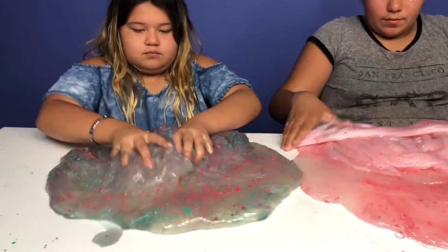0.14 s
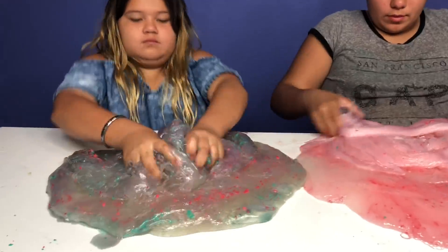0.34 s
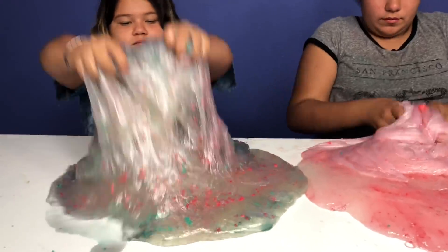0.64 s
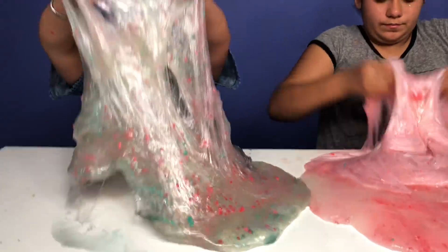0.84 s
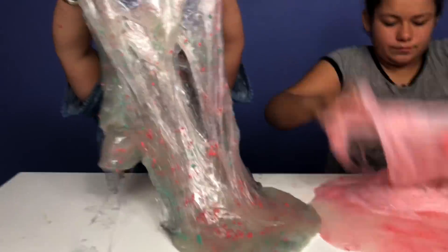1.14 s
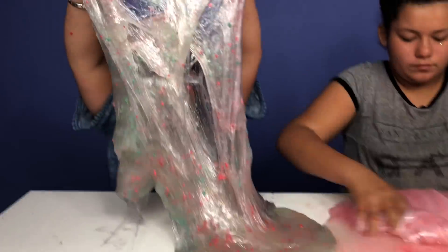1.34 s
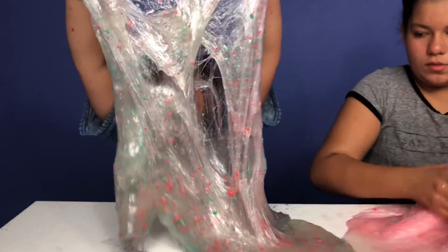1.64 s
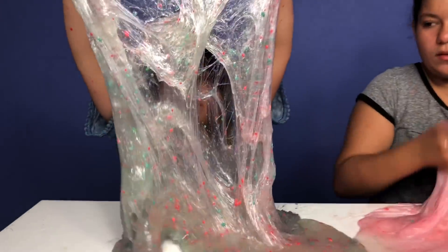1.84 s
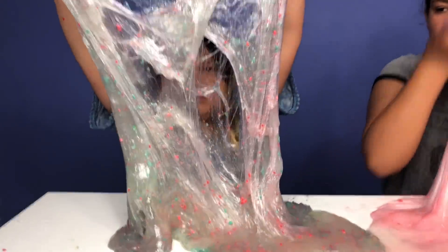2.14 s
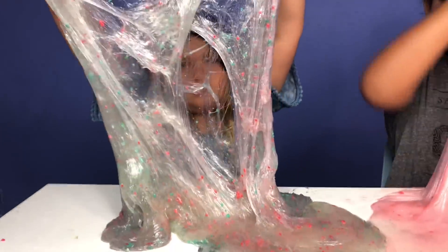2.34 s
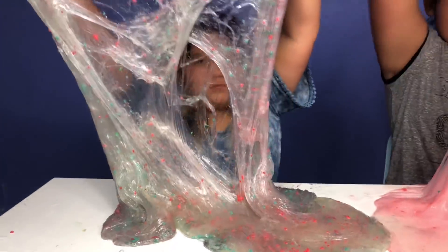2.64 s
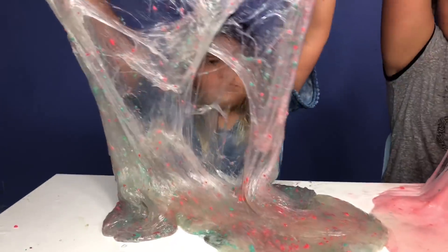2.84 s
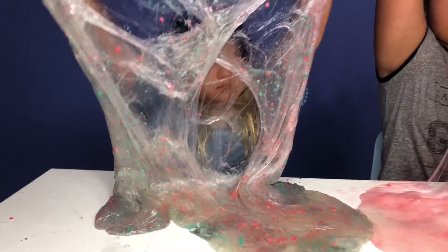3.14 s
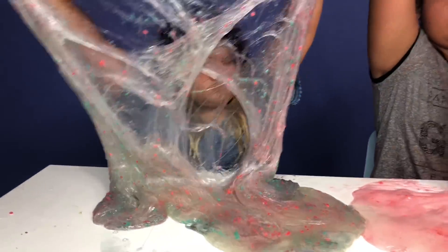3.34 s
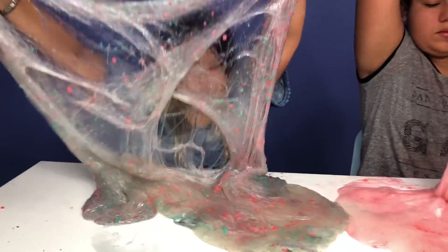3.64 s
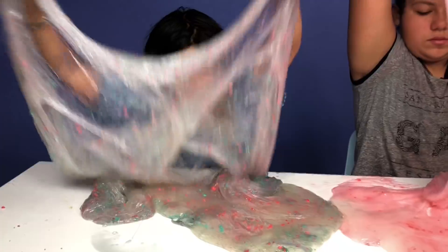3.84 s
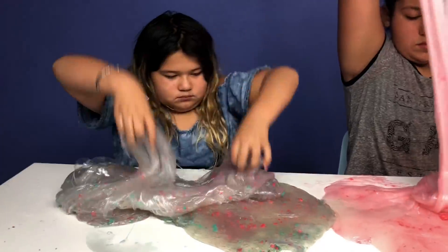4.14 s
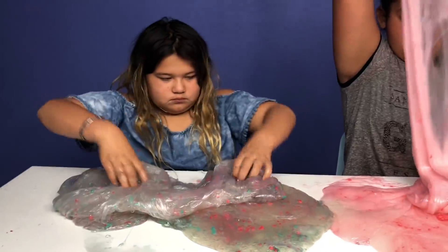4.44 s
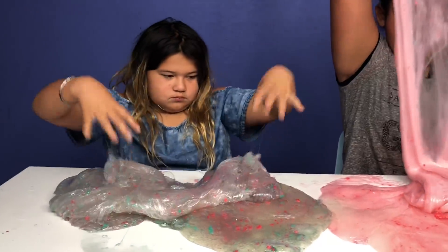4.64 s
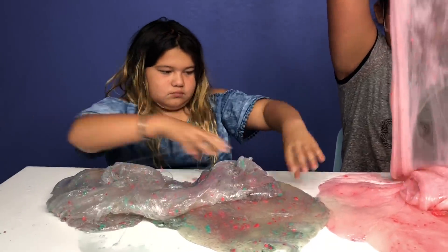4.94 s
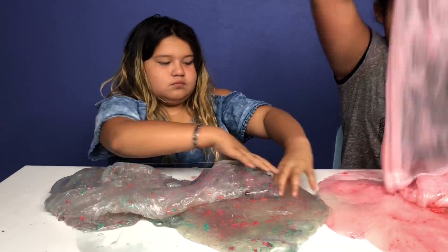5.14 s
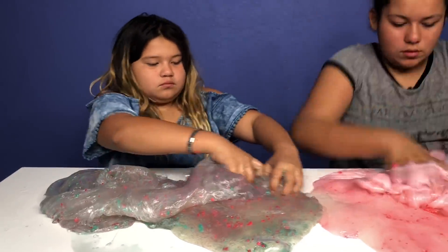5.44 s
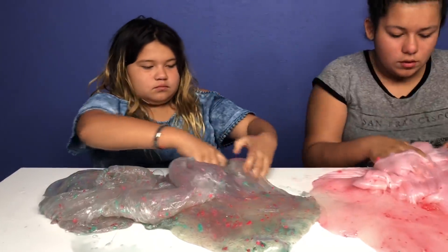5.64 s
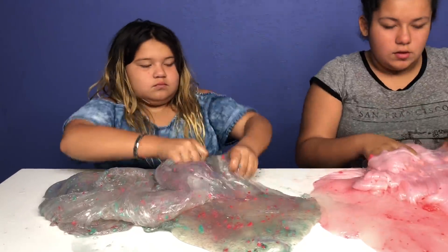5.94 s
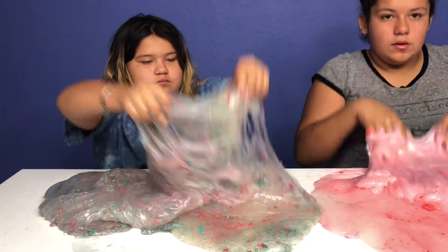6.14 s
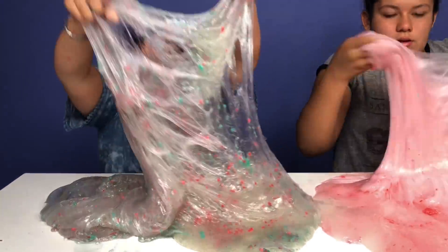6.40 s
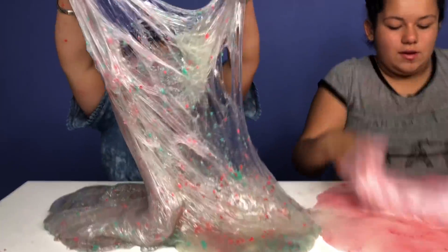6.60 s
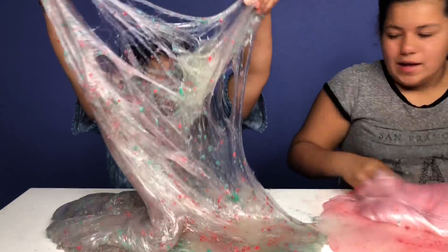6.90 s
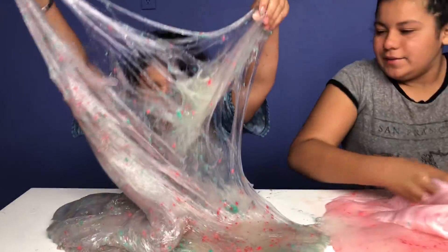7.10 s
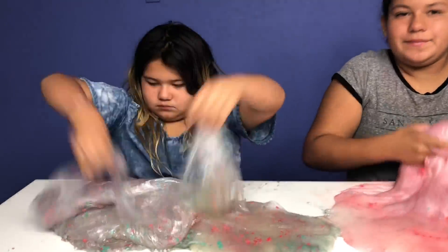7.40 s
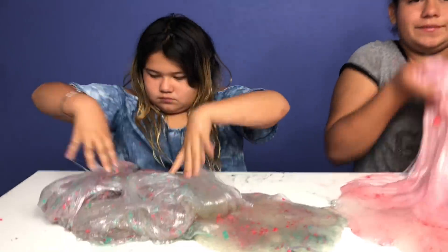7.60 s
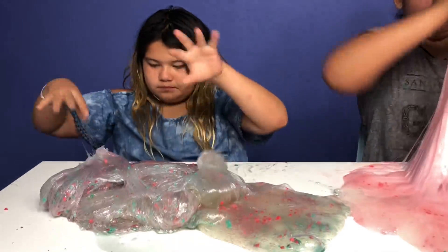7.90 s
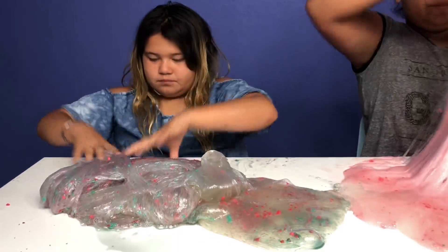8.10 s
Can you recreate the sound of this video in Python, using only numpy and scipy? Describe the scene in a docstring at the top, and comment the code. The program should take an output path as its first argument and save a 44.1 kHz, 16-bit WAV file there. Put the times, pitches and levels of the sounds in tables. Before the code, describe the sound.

Sticky slime full of popping candy is kneaded, stretched and dropped on a table, fizzing and snapping sharply, with wet slaps and squelches.

```python
"""Popping-candy slime on a table

Slime full of popping candy is kneaded and stretched on a table in a small, live room.
Clouds of tiny ringing bursts make the fizz, sticky crackle and squelch; placed bursts make the loud snaps.
Gliding trains of short rings run from sticky to low; heavy folds flop as swells of noise and splash.
Knocks sweep down in pitch and ring the table top; decaying noise gives the echo, over soft room air."""
import sys
import numpy as np
from scipy import signal
from scipy.fft import irfft
from scipy.io import wavfile

SR = 44100
rng = np.random.default_rng(int(sys.argv[2]) if len(sys.argv) > 2 else 0)


def generate_wav(signal):
    """Clip the signal to [-1, 1] and save it as 16-bit WAV at the path in sys.argv[1]."""
    frames = np.transpose(np.atleast_2d(signal))
    scaled = np.clip(frames, -1, 1) * 32767
    pcm = np.round(scaled).astype(np.int16)
    wavfile.write(sys.argv[1], SR, pcm)


N = 364266   # length in samples


def from_db(db):
    """Decibels to gain."""
    return 10 ** (np.asarray(db) / 20)


def rms_one(x):
    """Scale to rms 1."""
    return x / np.sqrt(np.mean(x ** 2) + 1e-20)


def at_hz(points, hz):
    """Read a table on a log-frequency axis."""
    points = np.array(points)
    return np.interp(np.log(hz), np.log(points[:, 0]), points[:, 1])


def add(track, s, sound):
    """Mix a sound in from time s on."""
    start = max(round(s * SR), 0)
    track[start:start + len(sound)] += sound[:max(N - start, 0)]


def noise_bands(size, count=19):
    """Half-octave bands (Hz, noise), from the deep bass upwards, that add up to roughly white noise."""
    edges = 30 * 2 ** (np.arange(count + 1) / 2)
    white = rng.standard_normal((2, size))   # neighbouring bands use different noise
    for k, (low, high) in enumerate(zip(edges, edges[1:])):
        sos = signal.butter(2, [low, min(high, .48 * SR)], "band", fs=SR, output="sos")
        yield np.sqrt(low * high), signal.sosfilt(sos, white[k % 2])


def cavity(x, hz, q):
    """A damped resonance; a unit click comes out with unit energy."""
    w = 2 * np.pi * min(hz, .45 * SR) / SR
    damp = np.sin(w) / (2 * max(q, .2))
    numerator = [damp, 0, -damp]
    denominator = [1 + damp, -2 * np.cos(w), 1 - damp]
    return signal.lfilter(numerator, denominator, x + 1e-18) * np.sqrt((1 + damp) / damp)


def burst(x, hz, q, shell_share=0.24):
    """A bursting pocket swells through two resonances in a row, then rings out; unit energy."""
    shell = cavity(x, hz, shell_share * q)
    return rms_one(cavity(shell, hz, q)) / np.sqrt(len(x))


def broad_peak(hz, pitch, q):
    """Gain of a soft contact: strongest round its pitch, with little treble."""
    return 1 / np.hypot(1, q * (hz / pitch - pitch / hz)) / np.hypot(1, hz / (4 * pitch))


def grains(colour, per_s, spread_db, q, size, count):
    """Tiny bursts at random moments, mostly weak, each ringing at one of many pitches; rms 1."""
    total = int(per_s * size / SR) + 1
    when, which, strength, sign = rng.random((total, 4)).T
    height_db = spread_db * np.minimum(-np.log(1 - strength), 4.5)
    height = from_db(height_db) * np.sign(sign - .5)
    out = np.zeros(size)
    for k, hz in enumerate(np.geomspace(colour[0][0], colour[-1][0], count)):
        mine = (which * count).astype(int) == k
        click = signal.unit_impulse(int(3 * q * SR / hz) + 8)
        grain = from_db(at_hz(colour, hz)) * burst(click, hz, q)
        places = (when[mine, None] * size).astype(int) + np.arange(len(grain))
        out += np.bincount(places.ravel(), np.outer(height[mine], grain).ravel(), size)[:size]
    return rms_one(out)


# Still air of the room. Each row: frequency in Hz, relative level in dB per Hz.
AIR_COLOUR = [(30, -7), (65, 5.5), (140, -1.5), (400, -7.5), (1200, -3.5), (3000, -7), (7000, -17),
              (15000, -8)]
AIR_DB = -58


def room_air():
    """The still air is steady noise, weighted band by band."""
    return from_db(AIR_DB) * rms_one(sum(from_db(at_hz(AIR_COLOUR, hz)) * band for hz, band in noise_bands(N)))


# Candy fizz drive, livelier while the slime is drawn out into a sheet.
# Each row: time in seconds, drive in dB before the layer trims.
CANDY_DRIVE = [(0.0, -51.5), (0.62, -46.5), (2.39, -46.5), (3.31, -49), (3.43, -47), (4.26, -49),
               (4.58, -51.5), (5.22, -50), (5.45, -49), (5.73, -53), (5.93, -47.5), (6.21, -47),
               (6.53, -44.5), (6.83, -41.5), (7.06, -45.5), (7.84, -50)]
# The hands squeeze or pull the slime. Each row: start in seconds, hold in seconds,
# sticky crackle drive in dB, squelch drive in dB (both before the layer trims).
HAND_STROKES = [(0.073, 0.36, -54, -53.5), (0.52, 0.48, -49, -51), (0.994, 0.14, -50, -71),
                (1.788, 0.33, -50, -56), (2.327, 0.13, -52.5, -56.5), (3.593, 0.12, -55.5, -64),
                (4.055, 0.0072, -49, -50.5), (4.48, 0.076, -54.5, -58.5), (5.386, 0.035, -48, -47.5),
                (6.125, 0.18, -50, -51), (7.128, 0.34, -56, -56), (7.55, 0.38, -49.5, -55.5),
                (8.185, 0.08, -67, -51)]
GRIP_S, RELAX_S = 0.073, 0.12   # exponential rise and fall of every stroke
CREEP_STICKY_DB, CREEP_SQUELCH_DB = -58.5, -65.5   # drives as the slime creeps under its own weight


def handling():
    """Gains of fizz, sticky crackle and squelch: each stroke swells, holds and relaxes to a slow creep."""
    t = np.arange(N) / SR
    fizz = from_db(np.interp(t, *np.transpose(CANDY_DRIVE)))
    sticky, squelch = from_db(CREEP_STICKY_DB), from_db(CREEP_SQUELCH_DB)
    for s, hold, sticky_db, squelch_db in HAND_STROKES:
        before, after = np.maximum(s - t, 0), np.maximum(t - s - hold, 0)
        effort = np.exp(-before / GRIP_S - after / RELAX_S)
        sticky = np.hypot(sticky, from_db(sticky_db) * effort)
        squelch = np.hypot(squelch, from_db(squelch_db) * effort)
    return fizz, sticky, squelch


# Colour of the fine candy fizz. Each row: grain pitch in Hz, relative level in dB.
FIZZ_COLOUR = [(3000, -19), (4500, -3), (6500, 0.5), (9000, 3.5), (12000, -13.5), (15000, -29)]
# Colour of the lone candy ticks. Each row: grain pitch in Hz, relative level in dB.
TICK_COLOUR = [(2000, -2.5), (5000, 3.5), (11000, 2.5)]
# Colour of the sticky clicks. Each row: grain pitch in Hz, relative level in dB.
STICKY_COLOUR = [(1100, -3), (2000, 3), (3000, 7), (4200, 3)]
# Colour of the soft squelch. Each row: grain pitch in Hz, relative level in dB.
SQUELCH_COLOUR = [(140, -6), (260, -7.5), (450, 2.5), (750, 0.5), (1200, 0.5)]


def crackle(fizz_gain, sticky_gain, squelch_gain):
    """One patch of slime: fine fizz, lone candy ticks, sticky clicks and a soft squelch."""
    fizz = from_db(-2.5) * grains(FIZZ_COLOUR, per_s=320, spread_db=3.5, q=2.03, size=N, count=9)
    ticks = from_db(-5.5) * grains(TICK_COLOUR, per_s=7.0, spread_db=1.3, q=2.5, size=N, count=8)
    sticky = from_db(-3.0) * grains(STICKY_COLOUR, per_s=65, spread_db=6.0, q=2.36, size=N, count=7)
    squelch = from_db(-1.5) * grains(SQUELCH_COLOUR, per_s=60, spread_db=3.0, q=2.47, size=N, count=9)
    return fizz_gain * (fizz + ticks) + sticky_gain * sticky + squelch_gain * squelch


# How long the room rings. Each row: frequency in Hz, time to fall by 60 dB in seconds.
ECHO_T60 = [(100, 0.62), (700, 0.74), (1800, 0.65), (5000, 0.5), (13000, 0.63)]
# Colour of the echo. Each row: frequency in Hz, relative echo level in dB.
ECHO_COLOUR = [(60, 8), (300, 2.5), (750, -2), (1400, 6.5), (2300, 3.5), (7000, 4), (15000, 0)]


def room(x, gap_s, size=24576):
    """Diffuse echo that dies band by band and starts just after the direct sound; unit energy."""
    t, echo = np.arange(size) / SR, 0
    for hz, band in noise_bands(size):
        t60 = at_hz(ECHO_T60, hz)
        tail = rms_one(band * from_db(-60 * t / t60))
        echo = echo + from_db(at_hz(ECHO_COLOUR, hz)) * np.sqrt(hz * t60) * tail
    fade_in = np.clip(t / gap_s - 1, 0, 1)
    echo = rms_one(echo * fade_in) / np.sqrt(size)
    return signal.fftconvolve(x, echo)[:N]


# The loudest snaps of candy and of air pockets.
# Each row: start in seconds, energy in dB with its splinters, pitch in Hz, sharpness Q.
LOUD_POPS = [(0.1621, -13.5, 6500, 1.7), (0.3326, -14.5, 10900, 3.3), (0.421, -10.5, 11100, 3.6),
             (0.4735, -9, 5200, 8.4), (0.493, -8, 4300, 3.5), (0.5821, -14, 1180, 1.8),
             (0.693, -3.5, 8900, 1.2), (0.7834, -12.5, 6100, 3.4), (1.039, -4.5, 3320, 3.7),
             (1.2935, -9, 6100, 4.3), (1.3219, -2.5, 1290, 3), (1.483, -10.5, 9500, 4.3),
             (1.6326, -10, 5900, 2.6), (1.6352, -11, 1290, 6), (1.6854, -12, 3260, 2.6),
             (1.8123, -12.5, 9700, 3.6), (2.1054, -3.5, 4100, 3.4), (2.443, -12, 8950, 4),
             (2.607, -8.5, 7200, 2), (2.953, -14, 8200, 1.4), (2.9756, -2.5, 5900, 4),
             (3.0462, -11, 7000, 2), (3.2659, 5.5, 7270, 2.1), (3.514, -16, 8500, 4.5),
             (3.708, -10, 7150, 1.4), (3.802, -16.5, 1240, 2), (4.0011, 1, 8100, 1.9),
             (4.2545, -6.5, 5400, 3.7), (4.826, -12.5, 5840, 3), (5.2815, -13, 7350, 2),
             (5.2994, -3.5, 5700, 3), (5.3582, -5.5, 8200, 1.3), (5.3668, -7.5, 3900, 2.7),
             (5.5045, 4, 5600, 1.8), (5.7982, -15, 5440, 7.5), (6.0506, -11, 2880, 1.7),
             (6.0861, -11, 5800, 3), (6.1482, -13, 11100, 5), (6.1717, 1.5, 9000, 0.91),
             (6.322, -12, 4360, 4), (6.4127, -9, 4180, 5.1), (6.467, -7, 5950, 1.7),
             (6.503, -11, 4950, 5.6), (6.6598, -12, 5870, 3), (6.7134, 1, 2040, 0.94),
             (6.724, -2, 3440, 2.2), (6.919, -7, 7100, 4.4), (6.9264, -9.5, 7700, 2.7),
             (6.979, -6, 8500, 1.4), (7.1436, -14, 2230, 1.5), (7.3195, -5.5, 2760, 2.5),
             (7.4858, -1, 5300, 9.9), (7.5084, -5, 4000, 0.72), (7.646, -5.5, 4260, 1.9),
             (7.682, -10.5, 6660, 5.7), (7.7325, -7, 2660, 1.8), (8.1478, -10, 8400, 2.4)]


def pops(splinter_db, splinter_s, scatter, body_db, body_ratio, body_q, count, size=1024):
    """A shell cracks, its cavity rings and the slime ticks dully; row 0 has snaps, the rest splinters."""
    out, click = np.zeros((count, N)), signal.unit_impulse(size)
    for (s, db, hz, q), chance in zip(LOUD_POPS, rng.random((len(LOUD_POPS), count - 1, 3))):
        body = from_db(body_db) * burst(click, body_ratio * hz, body_q)
        parts = [burst(click, hz, q) + body]
        for late, pitch, height in chance:
            delay = min(int(splinter_s * SR * (.15 + late)), size - 1)
            splinter_hz = hz * scatter ** ((2 * pitch - 1) / (1 + q))   # sharp snaps scatter less
            splinter = burst(signal.unit_impulse(size, delay), splinter_hz, q)
            parts.append(from_db(splinter_db) * (2 * height - 1) * splinter)
        for track, part in zip(out, parts / np.linalg.norm(parts)):
            add(track, s, from_db(db) * part)
    return out


# Ringing modes of the table top. Each row: frequency in Hz, level in dB against the thump,
# time to fall by 60 dB in seconds.
TABLE_MODES = [(61.5, 2, 0.21), (131.8, 3.5, 0.4), (255.7, 5.5, 0.18), (372, -2, 0.33)]
# The slime's weight or a hand lands on the table. Each row: time in seconds, slap energy in dB,
# pitch in Hz, travel time of 1 kHz across the top in seconds, thump level in dB.
TABLE_KNOCKS = [(0.222, -25, 260, 0.0068, -52.5), (1.2948, -5.5, 334, 0.004, -50),
                (1.322, -4.5, 450, 0.012, -54), (5.093, -16.5, 199, 0.006, -55),
                (5.5069, 3.5, 453, 0.012, -33), (6.689, -12, 264, 0.007, -39.5),
                (6.723, 0, 415, 0.012, -35.5), (7.509, -12, 520, 0.0065, -49),
                (8.2162, -8.5, 330, 0.00353, -45.5)]


def knocks(slap_q, build_s, size=22050):
    """A bending wave crosses the table, low notes slowest: slaps sweep down into the ringing modes."""
    slaps, thumps, reference_hz = np.zeros(N), np.zeros(N), 1000
    t, hz = np.arange(size) / SR, np.maximum(np.fft.rfftfreq(size, 1 / SR), 1)
    for s, slap_db, pitch, travel, thump_db in TABLE_KNOCKS:
        dispersion = np.exp(-4j * np.pi * travel * np.sqrt(reference_hz * hz))
        wave = irfft(broad_peak(hz, pitch, slap_q) * dispersion, size)
        add(slaps, s - travel, from_db(slap_db) * wave / np.linalg.norm(wave))
        for mode_hz, db, t60 in TABLE_MODES:
            # each mode starts half a cycle before its wave arrives
            arrival = travel * np.sqrt(reference_hz / mode_hz) - .5 / mode_hz
            since = np.maximum(t - arrival, 0)
            ring = np.sin(2 * np.pi * mode_hz * since) * (1 - np.exp(-since / build_s))
            add(thumps, s - travel, from_db(thump_db + db - 60 * since / t60) * ring)
    return slaps, thumps


# Gliding trains of short rings: sticky peels, a low blup, a ringing wash after the big slap, a low rub.
# Each row: start in seconds, length in seconds, level in dB before the mix trim,
# first pitch in Hz, last pitch in Hz.
RING_TRAINS = [(0.46, 0.23, -49.5, 5270, 3800), (0.659, 0.35, -52, 2780, 1770),
               (1.621, 0.085, -48.5, 1370, 1290), (2.284, 0.06, -46, 368, 320),
               (3.977, 0.22, -62, 616, 965), (5.543, 0.1, -43.5, 1390, 1000),
               (7.198, 0.29, -58.5, 148, 82.5), (7.802, 0.17, -57, 1690, 1470)]


def gliding_rings(per_s, spread_db, q, scatter, size=2048):
    """Short damped rings follow one another at random, crowding midway, while their pitch glides."""
    out, click = np.zeros(N), signal.unit_impulse(size)
    for s, length, db, first_hz, last_hz in RING_TRAINS:
        along = rng.beta(2, 2, int(per_s * length) + 1)
        total = len(along)
        heights = rms_one(from_db(spread_db * rng.standard_normal(total))) * rng.choice([-1, 1], total)
        glide = first_hz * (last_hz / first_hz) ** along
        pitches = glide * np.exp(scatter * rng.standard_normal(total))
        gain = from_db(db) * np.sqrt(SR / per_s)
        for u, height, hz in zip(along, heights, pitches):
            add(out, s + u * length, gain * height * cavity(click, hz, q))
    return out


# Colour of the wet splash. Each row: grain pitch in Hz, relative level in dB.
SPLASH_COLOUR = [(1400, -4), (3000, -5.5), (6000, 5), (10000, -9)]
# Wet folds of slime collapsing. Each row: time in seconds, puff level in dB, puff pitch in Hz,
# contact time in seconds, wet splash level in dB (levels before the swell shapes them).
SLIME_FLOPS = [(1.292, -38, 480, 0.03, -37), (1.322, -28, 900, 0.013, -30), (1.636, -43, 296, 0.017, -48),
               (2.309, -48, 320, 0.033, -44), (3.926, -52.5, 354, 0.012, -63), (5.1, -55, 300, 0.016, -64),
               (5.506, -19.5, 626, 0.0043, -17.5), (5.885, -44.5, 191, 0.0075, -70),
               (6.689, -36.5, 700, 0.013, -29.5), (6.702, -38, 600, 0.009, -25.5),
               (6.722, -26, 650, 0.0084, -33), (7.468, -41.5, 380, 0.015, -58),
               (7.509, -35, 1000, 0.0081, -29.5), (7.547, -34.5, 1100, 0.007, -46)]


def flops(puff_q, sag_cycles, rise_share, size=16384):
    """A fold collapses: air puffs out, high notes first, and the wet skin splashes."""
    out, lead = np.zeros(N), .1   # lead: seconds of room for the rise
    t = np.arange(size) / SR - lead
    bands = list(noise_bands(4 * size, count=14))

    def swell(late, length):
        """A quick rise and a slower fall round the moment of contact."""
        return np.exp(-np.maximum((t - late) / length, (late - t) / (rise_share * length)))

    for s, puff_db, pitch, contact, splash_db in SLIME_FLOPS:
        puff, power, start = 0, 0, rng.integers(3 * size)
        for hz, band in bands:
            air = broad_peak(hz, pitch, puff_q) * band[start:start + size]
            lag = sag_cycles * (1 / hz - 1 / pitch)
            puff = puff + air * swell(lag, contact + max(lag, 0))
            power += air.var()
        splash = grains(SPLASH_COLOUR, per_s=350, spread_db=3.6, q=1.6, size=size, count=12)
        wet = from_db(splash_db) * splash * swell(0, contact)
        add(out, s - lead, from_db(puff_db) * puff / np.sqrt(power) + wet)
    return out


def scene(count=4):
    """Patches of slime crackle and flop, each with its own echo; gliding rings and slaps share another."""
    gains = [gain / np.sqrt(count) for gain in handling()]
    out = room_air()
    snap_rows = pops(splinter_db=-3.5, splinter_s=0.0011, scatter=3.8,
                     body_db=-18, body_ratio=0.41, body_q=2.3, count=count)
    for snaps in snap_rows:
        patch = crackle(*gains)
        folds = flops(puff_q=1.0, sag_cycles=0.64, rise_share=0.6) / np.sqrt(count)
        echo_send = from_db(-2.5) * patch + from_db(-7.0) * snaps + from_db(-3.5) * folds
        out += patch + snaps + folds + room(echo_send, gap_s=0.00018)
    rings = from_db(1.0) * gliding_rings(per_s=640, spread_db=-1.0, q=4.8, scatter=0.15)
    slaps, thumps = knocks(slap_q=0.52, build_s=0.0021)
    echo_send = from_db(-8.5) * rings + from_db(-5.0) * slaps
    out += rings + slaps + thumps + room(echo_send, gap_s=0.002)
    return out[None]


CEILING, CUTOFF_HZ = .8, 15900   # peak limit before the top cut, treble cutoff


def record(dry):
    """The microphone loses the deep bass, the loudest peaks are softly limited and the top is cut steeply."""
    thin = signal.sosfilt(signal.butter(3, 47, "high", fs=SR, output="sos"), dry)
    rounded = thin / (1 + (thin / CEILING) ** 4) ** .25
    return signal.sosfilt(signal.cheby1(12, .1, CUTOFF_HZ, fs=SR, output="sos"), rounded)


dry = scene()
out = record(dry)
generate_wav(out)
```